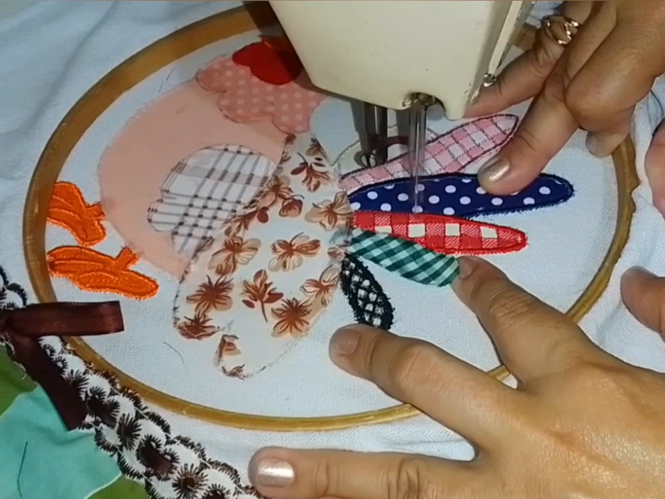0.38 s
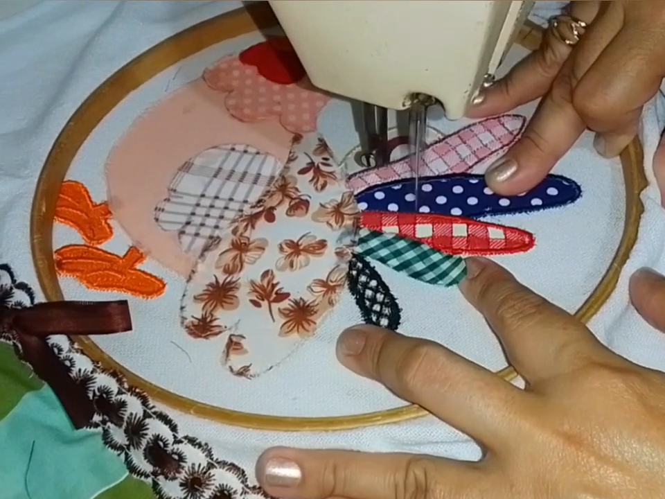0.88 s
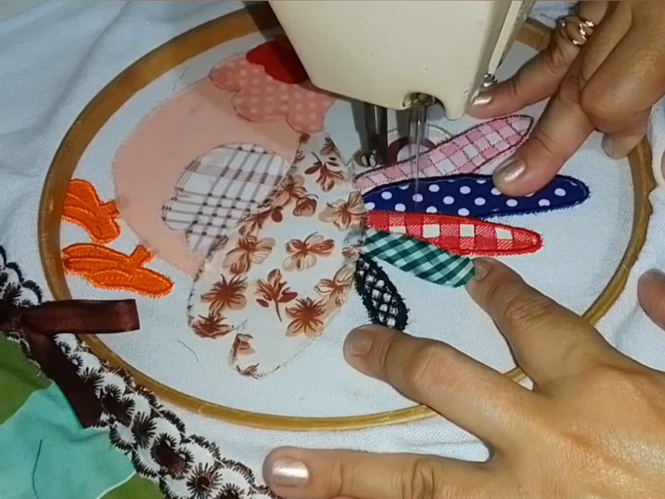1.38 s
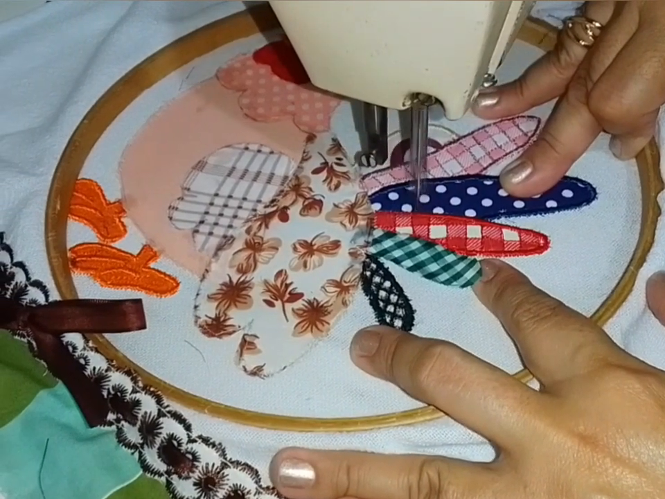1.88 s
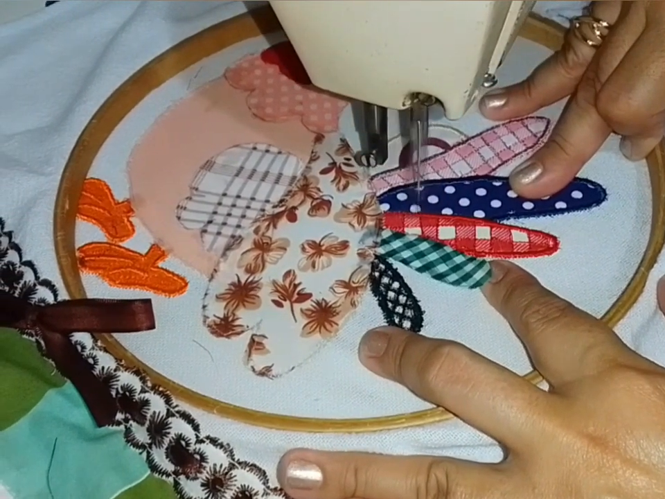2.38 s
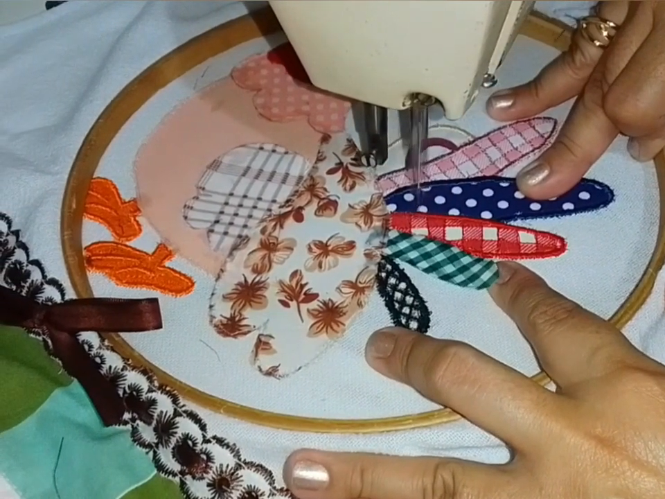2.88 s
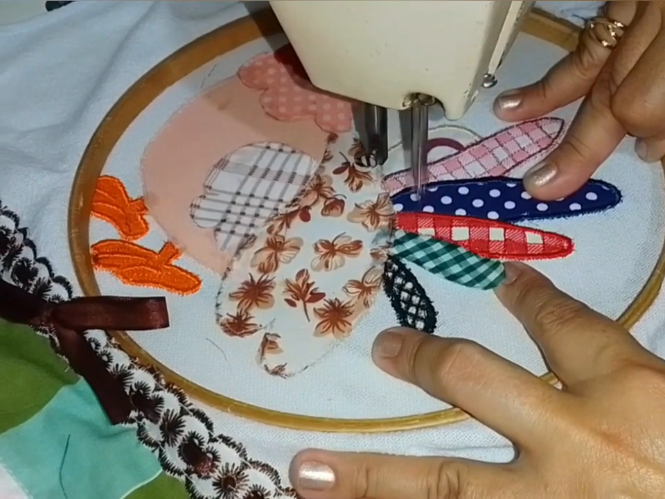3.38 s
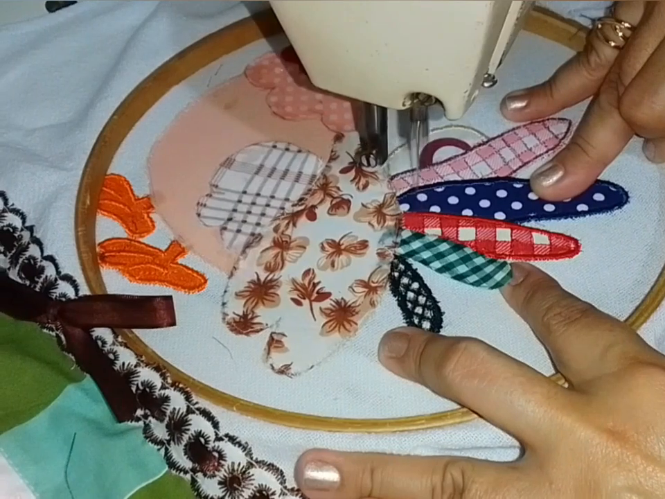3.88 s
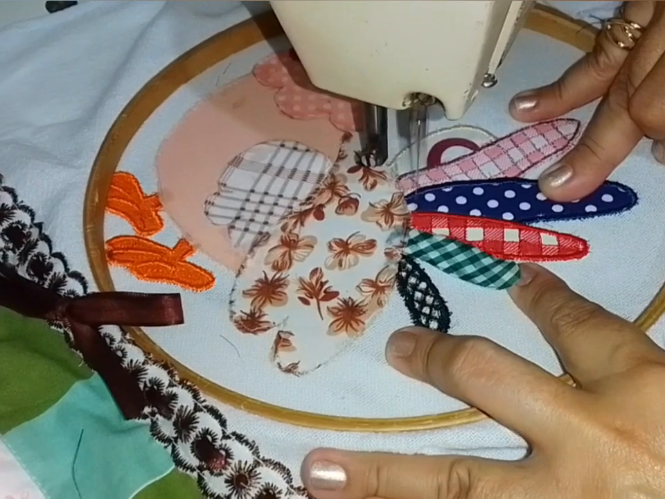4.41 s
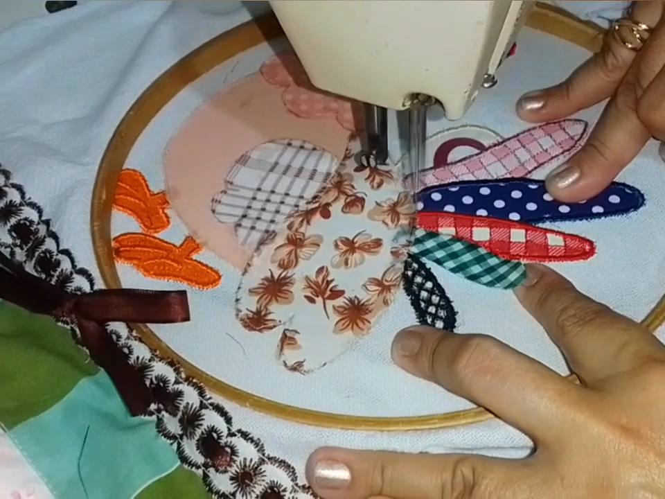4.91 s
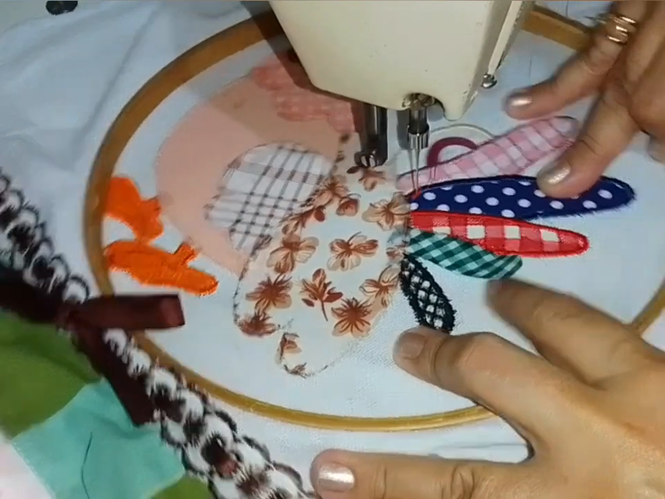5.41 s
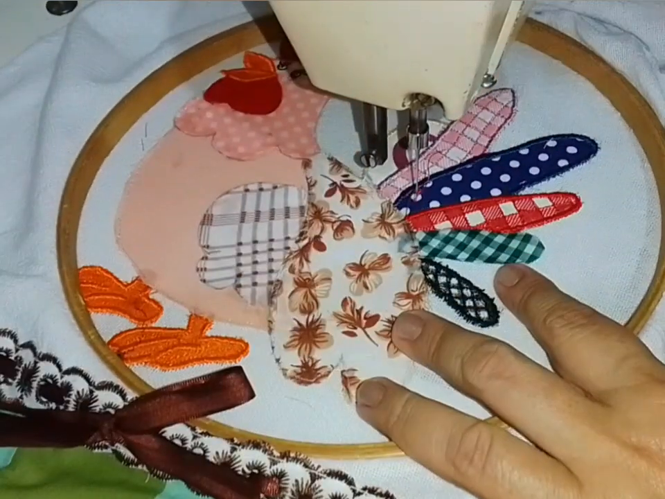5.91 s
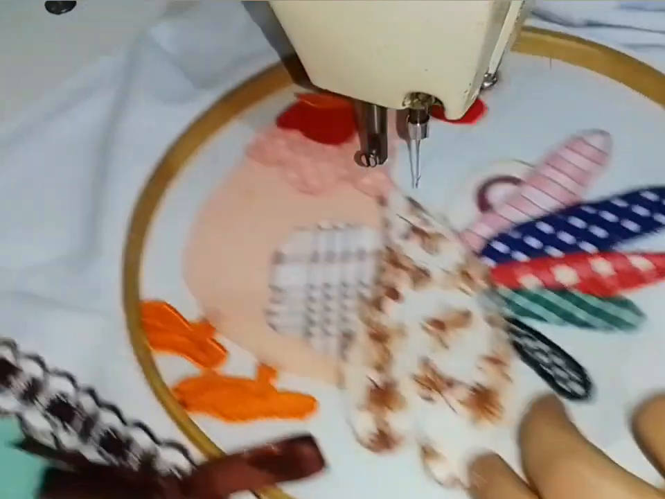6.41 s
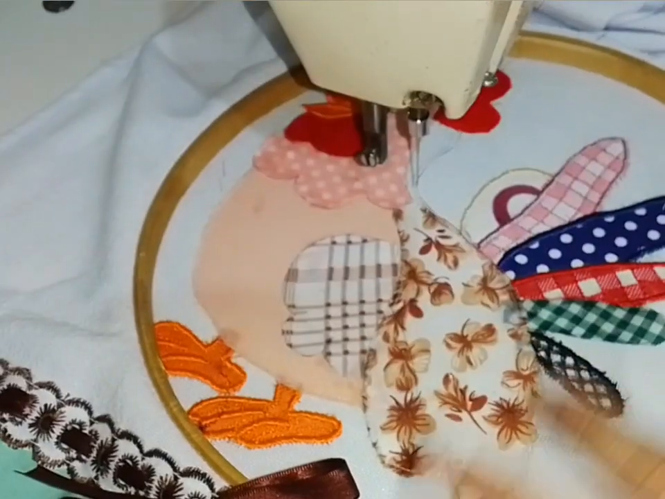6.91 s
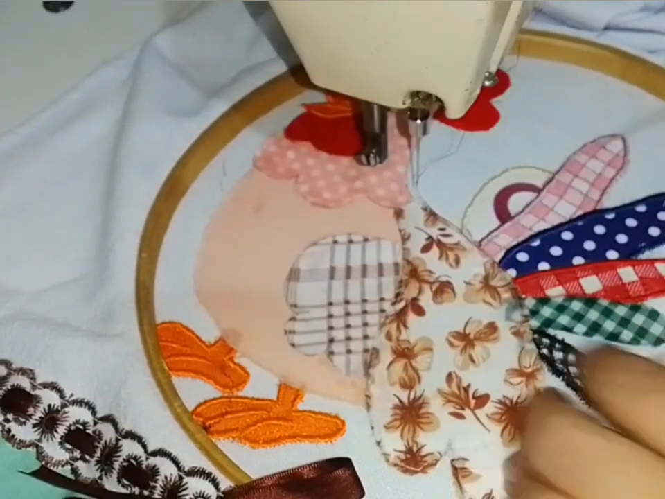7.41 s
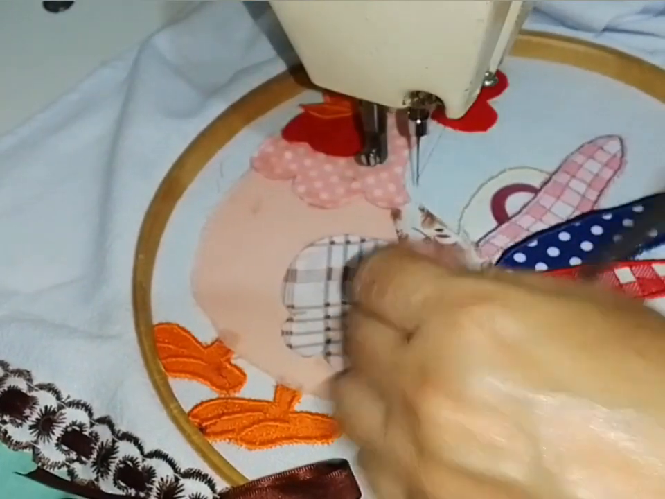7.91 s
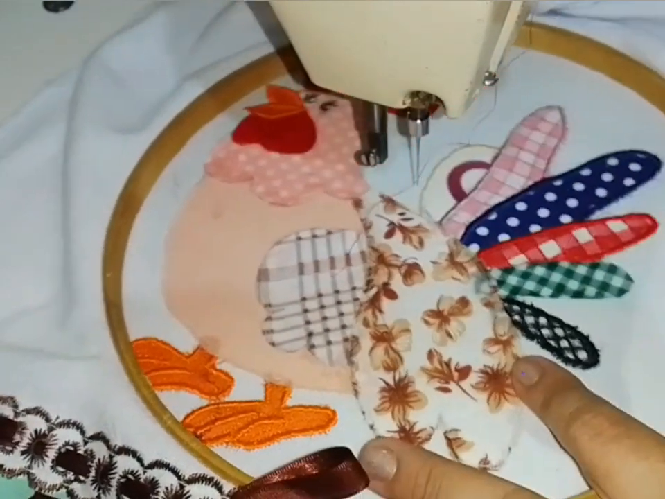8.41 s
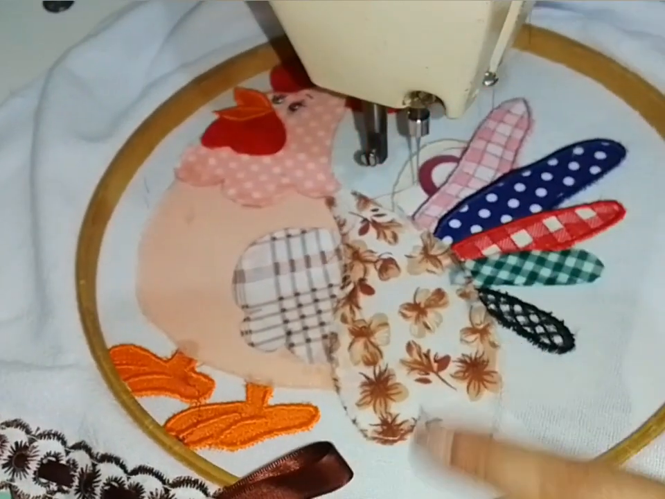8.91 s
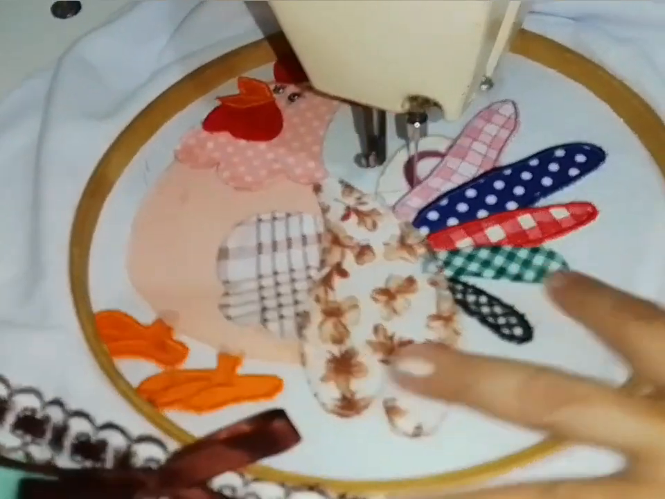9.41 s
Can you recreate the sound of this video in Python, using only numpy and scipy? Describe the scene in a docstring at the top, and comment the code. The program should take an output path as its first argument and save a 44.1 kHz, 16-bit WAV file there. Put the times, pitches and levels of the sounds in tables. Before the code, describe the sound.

Fast, dense machine stitching fills the first half, throbbing and rattling right beside the microphone, then cuts off sharply. Only a steady low electric hum with airy whirr remains. Over it come short fabric rubs, finger and hoop ticks, dull taps on the machine bed, a crisp thread snip and steel scissors bouncing as they are put down, with faint echoes of a small room.

```python
"""A sewing machine stitches fast and close by, eases off and stops at about 5.2 s; its motor hums on.
Machine: impacts and noise drive the cast frame's modes and the bands of loose metal parts, with louder clacks.
Motor: phase-shaken mains hum tones over coloured noise. In the pause grainy noise slides as cloth and hoop;
noise snaps tick and a thread is snipped, pings over thuds knock on the bed, and scissors are laid down
as cracks with short steel modes; these single blows echo in a small room."""
import sys
import numpy as np
from scipy import signal
from scipy.fft import rfft, irfft
from scipy.io import wavfile
from scipy.ndimage import uniform_filter1d

SR = 44100
rng = np.random.default_rng(int(sys.argv[2]) if len(sys.argv) > 2 else 0)


def store_pcm(level_fs):
    """Save levels as 16-bit WAV."""
    pcm = np.round(np.clip(level_fs, -1, 1) * 32767).astype(np.int16)
    wavfile.write(sys.argv[1], SR, np.atleast_2d(pcm).T)


def level_to_linear(level):
    """Convert decibel levels to linear amplitude factors, elementwise."""
    exponent = np.asarray(level, float) / 20
    return 10 ** exponent


N = 421155
T = np.arange(N) / SR
STOP_S = 5.215  # the clutch lets go


def level(x, db):
    """Scale to an rms level."""
    return x * level_to_linear(db) / np.sqrt(np.mean(x ** 2))


def band(x, lo_hz, hi_hz, order=2):
    """Band-pass."""
    return signal.sosfilt(signal.butter(order, [lo_hz, min(hi_hz, .45 * SR)], "band", fs=SR, output="sos"), x)


def colour(x, points, modes=()):
    """Causal filter with a smooth spectrum and resonance humps (minimum phase from the cepstrum)."""
    size = 2 ** 14
    hz = np.maximum(np.arange(size // 2 + 1) * SR / size, 1)
    points_hz, points_db = np.array(points).T
    db = np.interp(np.log(hz), np.log(points_hz), points_db)
    for mode_hz, width_hz, mode_db in modes:
        db = db + mode_db / (1 + (2 * (hz - mode_hz) / width_hz) ** 2)
    cepstrum = irfft(db * np.log(10) / 20)
    cepstrum[1:size // 2] *= 2
    cepstrum[size // 2 + 1:] = 0
    response = irfft(np.exp(rfft(cepstrum)))
    return signal.fftconvolve(x, response)[:len(x)]


def walk(rate_hz):
    """Random levels held 1 / rate_hz and slewed twice; spread near 1."""
    k = int(SR / rate_hz)
    held = np.repeat(rng.standard_normal(N // k + 1), k)
    return 1.326 * uniform_filter1d(uniform_filter1d(held, k), k)[:N]


def spikes(rows):
    """An impulse at each (s, dB)."""
    out = np.zeros(N)
    for s, db in rows:
        out[int(s * SR)] = level_to_linear(db)
    return out


def hail(per_second, spread_db):
    """Random impacts: many small, few large."""
    when, size = rng.random((2, N))
    return (when < per_second / SR) * level_to_linear(-spread_db * np.log(size + 0.0099))


def blows(per_second, uneven, strength):
    """Impacts whose gaps and sizes vary around a mean."""
    gap, size = rng.standard_normal((2, int(2 * per_second * N / SR)))
    at = (np.cumsum(np.maximum(1 + uneven * gap, .2)) * SR / per_second).astype(int)
    out = np.zeros(N)
    out[at[at < N]] = strength * level_to_linear(3.7 * size[at < N])
    return out


def decay(t, t60_s):
    """Exponential fall of 60 dB in t60_s."""
    return np.exp(-np.log(1000) * t / t60_s)


def puffs(x, rise_s, t60_s):
    """Give every impulse a short swell and a tail, top near 1."""
    t = T[:SR // 10]
    shape = (1 - np.exp(-t / rise_s)) * decay(t, t60_s)
    return signal.fftconvolve(x, shape / shape.max())[:N]


def ring(hz, t60_s, t):
    """One struck mode: a decaying sine."""
    return np.sin(2 * np.pi * hz * t) * decay(t, t60_s)


def casting(force, arm_db=0):
    """The cast frame: a broad colour, modes of wandering strength and the ring of the arm."""
    # Each row: frequency in Hz, spectrum in relative dB.
    body_colour = [(70, -35), (110, -11.5), (215, -25), (250, -22), (390, -10.5), (480, -5), (800, -6),
                   (1000, -7.5), (1200, -12.5), (1300, -4.5), (1430, -20.5), (3000, -19), (4000, -17),
                   (6600, -75.5)]
    # Frame resonances. Each row: frequency in Hz, width in Hz, level in dB against the colour.
    body_modes = [(340.2, 23.6, -5.5), (541.5, 8.1, -9), (649, 19, -15), (760.5, 21, -9.5),
                  (805, 11, -13.5), (872, 20, -18.5), (1351.6, 25, -8.5)]
    arm_hz, arm_width_hz, arm_mode_db = 427, 4.8, -14
    out = level(colour(force * rng.standard_normal(N), body_colour), 0)
    shaking = force * rng.standard_normal(N)
    for hz, width_hz, db in body_modes:
        mode = level(band(shaking, hz - width_hz / 2, hz + width_hz / 2, order=1), db)
        out = out + level_to_linear(0.64 * walk(2.62)) * mode
    arm = band(shaking, arm_hz - arm_width_hz / 2, arm_hz + arm_width_hz / 2, order=1)
    return out + level_to_linear(arm_db) * level(arm, arm_mode_db)


def loose_metal(x):
    """Loose metal parts: a bright colour with resonance humps."""
    # Each row: frequency in Hz, spectrum in relative dB.
    metal_colour = [(880, -27), (1500, -16), (1950, -5), (2310, -7.5), (3130, -5), (4070, -15), (4360, -7),
                    (5570, -9.5), (6080, -4.5), (6770, -7.5), (9360, 1.5), (10400, -5.5), (11400, -4.5),
                    (15600, -15.5)]
    # Part resonances. Each row: frequency in Hz, width in Hz, hump in dB above the colour.
    metal_modes = [(1890, 41, 3.6), (3590, 89, 4.5), (3900, 37, 6), (4250, 40, 3.7), (4380, 130, 5.5),
                   (4810, 53, 5), (5050, 240, 3.5), (6875, 60, 4.5), (7330, 130, 4.5), (7670, 120, 3.5),
                   (8150, 150, 5.4), (9546, 110, 4.6), (10930, 150, 3), (11400, 290, 4.1), (12870, 70, 4),
                   (13330, 70, 4)]
    return colour(x, metal_colour, metal_modes)


def clatter(shared):
    """Each impact is a hard touch and a puff of a few ms; frequency bands answer it differently."""
    rise_s, t60_s, contact = .0009, .0105, 3.5  # contact: hard first touch against the puff
    # driven nearly in time by belt and by hook: blows per s, unevenness of the gaps 0-1, strength
    loose = blows(25, .2, 2.2) + blows(68, .12, 1.6)
    edges_hz = [1000, 5000, 8000, 11000, 19000]
    steady_shares, driven_shares = [1.8, 1.6, 1.5, 0.83], [0.27, 0.44, 0.7, 1.2]
    rattle = 0
    for lo_hz, hi_hz, steady, driven in zip(edges_hz, edges_hz[1:], steady_shares, driven_shares):
        hits = shared + driven * loose + 0.89 * hail(130, 1.9)
        force = steady + puffs(hits, rise_s, t60_s)
        noise = band(rng.standard_normal(N), lo_hz, hi_hz) * force
        touch = contact * band(hits, lo_hz, hi_hz)
        rattle = rattle + (noise + touch) / np.sqrt(np.mean(force ** 2))
    return level(loose_metal(rattle), -3.5)


def clacks():
    """Loudest clacks of needle bar and hook: a noise puff and a sharp touch of the metal."""
    # Each row: start in seconds, level in dB.
    strikes = spikes([(0.0183, -5), (0.2512, -5), (0.5735, -9), (0.7406, -8), (0.785, -2.5), (1.227, -5),
                      (1.5498, -5), (1.6221, -7), (1.655, -2), (1.695, -6), (1.8795, -10), (2.7855, -7),
                      (2.868, -10), (3.1806, -9), (3.8366, -1.5), (4.0381, 0), (5.153, -11), (5.1735, -8)])
    noise = level(loose_metal(rng.standard_normal(N)), -11.0)
    touch = loose_metal(spikes([(0, 0)]))[:SR // 50]
    sharp = signal.fftconvolve(strikes, touch / np.abs(touch).max())[:N]
    return noise * puffs(strikes, 0.00049, 0.028) + .4 * sharp


def running(db, tail_db, fade_db_per_s):
    """Gain of a machine part: steady, easing off with the pedal, then cut short with a faint tail."""
    ease_s, ease_db_per_s, stop_db_per_s = 4.995, 16.5, 404
    eased_s = np.clip(T, ease_s, STOP_S) - ease_s
    after_s = np.maximum(T - STOP_S, 0)
    stop_db = np.maximum(-stop_db_per_s * after_s, tail_db - fade_db_per_s * after_s)
    return level_to_linear(db - ease_db_per_s * eased_s + stop_db)


def machine():
    """The casting throbs about 24 times a second under quicker pulses of clatter."""
    # Swelling and fading ring of the arm. Each row: time in seconds, gain in dB.
    arm_s, arm_gain_db = np.transpose([(0, 7.5), (.6, 4.5), (1.0, 12), (1.9, 7), (2.5, 5), (3.6, 5.5),
                                       (4.6, 2), (5.0, 11)])
    pulse_hz, throb_hz = 43.2, 24.3
    cycles = np.cumsum(pulse_hz * (1 + .01 * walk(1.537))) / SR
    # pulses of clatter about 43 times a second, with uneven gaps
    pulse_count = np.maximum.accumulate((cycles + 0.15 * walk(60)) // 1)
    pulses = np.diff(pulse_count, prepend=0) * level_to_linear(1.8 * rng.standard_normal(N))
    shared = 1.95 * pulses + hail(110, 1.5)
    throb = level_to_linear(1.0 * np.cos(2 * np.pi * cycles * throb_hz / pulse_hz) + .5 * walk(30.05))
    force = throb * (1 + 0.14 * puffs(shared, .002, 0.026))
    body = level(casting(force, np.interp(T, arm_s, arm_gain_db)), 0)
    return running(-23.5, -9, 63) * body + running(-17, -12, 130) * clatter(shared) + clacks()


def motor():
    """Mains hum, shaken in phase while the motor is loaded, over the whirr of fan and bearings."""
    # Magnetic hum. Each row: multiple of twice the mains frequency, rms in dB before load and wander.
    hum_tones = [(1, -43.5), (2, -43), (3, -50), (5, -50), (6, -62)]
    # Whirr spectrum. Each row: frequency in Hz, spectrum in relative dB.
    whirr_colour = [(30, -26), (85, -36), (105, -11.5), (200, -10), (245, -7.5), (400, -12.5), (620, -4.5),
                    (1000, -10), (1750, -13.5), (2420, -23.5), (3300, -21), (4500, -31), (5900, -51),
                    (6400, -25), (9800, -19.5), (11200, -38), (11700, -60), (15600, -46)]
    # Humps in the whirr spectrum; the narrow ones near 1.1-1.3 kHz sound as thin steady tones close to upper
    # multiples of the hum. Each row: frequency in Hz, width in Hz, hump in dB above the colour.
    whirr_modes = [(273.4, 32, 10), (332.3, 27, 9.6), (597, 56, 8.7), (1014, 25, 4), (1082, 8.7, 7.9),
                   (1190, 6.2, 4.5), (1328, 9.1, 12), (1375, 15, 7.1), (1691, 38, 8.9), (2810, 140, 6.5),
                   (2934, 21, 13), (3290, 36, 9.9), (3930, 60, 6.9), (5320, 320, 13)]
    hum_hz, loaded_db = 119.95, -1  # loaded_db per multiple: load weakens the upper tones
    load = np.clip((STOP_S + 0.032 - T) / 0.09, 0, 1)
    phase = 2 * np.pi * hum_hz * T + (.01 + 1.1 * load) * walk(12)
    hum = 0
    for k, db in hum_tones:
        gain = np.sqrt(2) * level_to_linear(db + loaded_db * k * load + 0.5 * walk(2.01))
        hum = hum + gain * np.sin(k * phase + k ** 2)
    whirr = colour(rng.standard_normal(N) * level_to_linear(0.51 * walk(40)), whirr_colour, whirr_modes)
    return hum + level(whirr, -37.5)


def sliding():
    """Gains of the rub below and above 11.3 kHz: each slide starts quickly, sags, then dies away."""
    # Cloth and hoop on the bed. Each row: start in seconds, length in seconds, level in dB,
    # level above 11.3 kHz against the rub, in dB.
    slides = [(5.49, 0.2, -43.5, -16), (5.729, 0.089, -44.5, -15), (5.891, 0.019, -40, -16),
              (6.032, 0.19, -40.5, -10), (6.259, 0.15, -43.5, -6), (6.393, 0.02, -34, -13),
              (6.947, .09, -46, -22), (7.07, 0.024, -40, -16), (8.42, 0.27, -55, -7),
              (8.785, 0.055, -44.5, -32), (9.378, .2, -55, -24)]
    attack_s, sag_db_per_s, release_db_per_s = 0.003, 15, 159
    resting_db, resting_upper_db = -59, -29  # hands resting on the cloth
    gains = level_to_linear(resting_db) * np.array([[1], [level_to_linear(resting_upper_db)]])
    for s, length_s, db, upper_db in slides:
        t = np.maximum(T - s, 0)
        fall_db = sag_db_per_s * t + release_db_per_s * np.maximum(t - length_s, 0)
        slide = np.minimum(t / attack_s, 1) * level_to_linear(db - fall_db)
        gains = gains + slide * np.array([[1], [level_to_linear(upper_db)]])
    return gains


def cloth():
    """Fibres catch and slip in fine grains: noise swelling at random impacts."""
    # Each row: frequency in Hz, spectrum in relative dB.
    cloth_colour = [(1180, -37), (2000, 9), (2120, 2.5), (2440, 0), (3910, -0.5), (5230, -7.5),
                    (6300, -1.5), (9300, 4.5), (14600, -11), (15600, -55)]
    lower_gain, upper_gain = sliding()
    catches = 2.0 + puffs(hail(300, 1.9), 0.0025, 0.05)
    grain = colour(rng.standard_normal(N) * catches, cloth_colour)
    split_hz = 11300
    lower = lower_gain * level(band(grain, 1840, split_hz, order=5), 0)
    return lower + upper_gain * level(band(grain, split_hz, 24000, order=3), 0)


def ticks():
    """Hoop, thread and fingers: short bright noise snaps, each with its own centre."""
    # Each row: start in seconds, level in dB, centre in Hz, T60 in seconds.
    snaps = [(5.269, -18, 7800, 0.017), (6.1763, -20.5, 6930, .025), (6.194, -20.5, 10000, .025),
             (6.271, -22, 8500, .015), (6.315, -21, 6500, .016), (6.349, -21.5, 7840, .045),
             (6.3894, -20.5, 5000, 0.017), (6.42, -20, 7000, .015), (6.959, -13, 8640, 0.013),
             (7.072, -22, 8500, .025), (7.733, -30, 9900, 0.05), (7.8945, -18, 9600, .012),
             (7.8979, -14, 9600, 0.014), (7.9002, -10, 9200, .007), (7.958, -25, 8000, .02)]
    out, t = np.zeros(N), T[:SR // 4]
    for s, db, hz, t60_s in snaps:
        i = int(s * SR)
        noise = rng.standard_normal(len(t))
        snap = level(band(noise, hz / 1.2, hz * 1.23, order=3), -3.5)
        snap = snap + level(band(noise, 1780, 4700, order=2), -12.5)  # the bed answers lower down
        out[i:i + len(t)] += level_to_linear(db) * snap * np.minimum(t / 0.0011, 1) * decay(t, t60_s)
    return out


def knocks():
    """Knocks on the bed: a woody ping over a thud that also rings the casting."""
    # Each row: start in seconds, level in dB, ping in Hz, T60 in seconds.
    bed_knocks = [(5.27, -28, 2200, .025), (5.566, -29, 2100, .03), (5.898, -19.5, 1540, 0.046),
                  (5.896, -28, 2300, .03), (6.17, -26, 438, 0.13), (6.349, -27, 2100, .025),
                  (6.407, -22, 1320, 0.063), (6.417, -24.5, 1306, 0.059), (8.314, -26.5, 1100, 0.05),
                  (8.377, -28, 1330, 0.077), (8.318, -29, 1890, .09)]
    out, t = np.zeros(N), T[:SR // 4]
    thud = level(band(casting(1), 250, 2700, order=3), -7.5)
    for s, db, ping_hz, t60_s in bed_knocks:
        i = int(s * SR)
        dull = thud[i:i + len(t)] * decay(t, t60_s)
        out[i:i + len(t)] += level_to_linear(db) * (.6 * ring(ping_hz, t60_s, t) + dull)
    return out


def scissors():
    """Landing and bouncing steel: a crack, modes struck differently each time, a loose joint's chatter."""
    # Each row: start in seconds, level in dB, share of the blade modes in dB.
    landings = [(8.3133, -5, -26), (8.326, -18, -20), (8.3372, -14, -22), (8.3754, -8.5, -9),
                (8.38, -16, -7), (8.3885, -23, 0), (8.3955, -8.5, -23)]
    # Modes of the closed scissors. Each row: frequency in Hz, level in dB, T60 in seconds.
    steel_modes = [(2920, 0, 0.021), (3090, -13, 0.018), (3160, -7, 0.015), (4270, -28, 0.036),
                   (7450, -21, 0.03), (8900, -17, 0.025), (9600, -19, .05), (10150, -25, 0.039)]
    blade_lo_hz, blade_hi_hz = 2500, 3600  # the long blades ring here
    out, t = np.zeros(N), T[:SR // 4]
    noise = rng.standard_normal(N)
    crack = level(band(noise, 7000, 10700, order=3), -7.0) + level(band(noise, 1500, 6000), -17.0)
    crack_fall = np.exp(-t / 0.00066) + 0.16 * np.exp(-t / 0.015)
    for s, landing_db, blade_db in landings:
        i = int(s * SR)
        steel = 0
        for hz, db, t60_s in steel_modes:
            share_db = blade_db * (blade_lo_hz < hz < blade_hi_hz)
            steel = steel + level_to_linear(db + 2.0 * rng.standard_normal() + share_db) * ring(hz, t60_s, t)
        out[i:i + len(t)] += level_to_linear(landing_db) * (steel + crack[i:i + len(t)] * crack_fall)
    return out


def room(x):
    """Dense, duller echoes of a small furnished room, starting after a few ms."""
    t60_s, echo_db = 0.19, -11
    t = T[:SR // 2]
    tail = band(rng.standard_normal(len(t)), 140, 11000, order=2) * decay(t, t60_s) * (t > .003)
    return x + level_to_linear(echo_db) * signal.fftconvolve(x, tail / np.sqrt(np.sum(tail ** 2)))[:N]


def scene():
    """Machine, motor and cloth stay dry; single blows let the room be heard."""
    return (machine() + motor() + cloth() + room(ticks() + knocks() + scissors()))[None]


def top_cut(x):
    """Nothing passes above the cut-off."""
    return signal.sosfilt(signal.butter(12, 15720, fs=SR, output="sos"), x)


def record(dry):
    """The phone cuts the deep bass."""
    mix = signal.sosfilt(signal.butter(3, 85, "high", fs=SR, output="sos"), dry)
    return top_cut(mix)


dry = scene()
out = record(dry)
store_pcm(out)
```